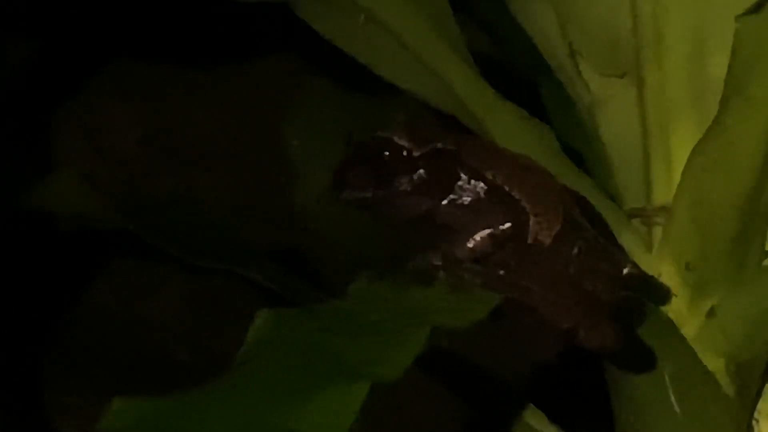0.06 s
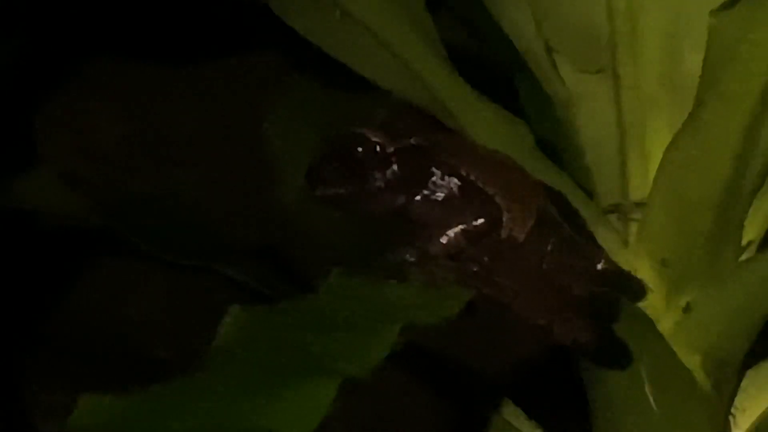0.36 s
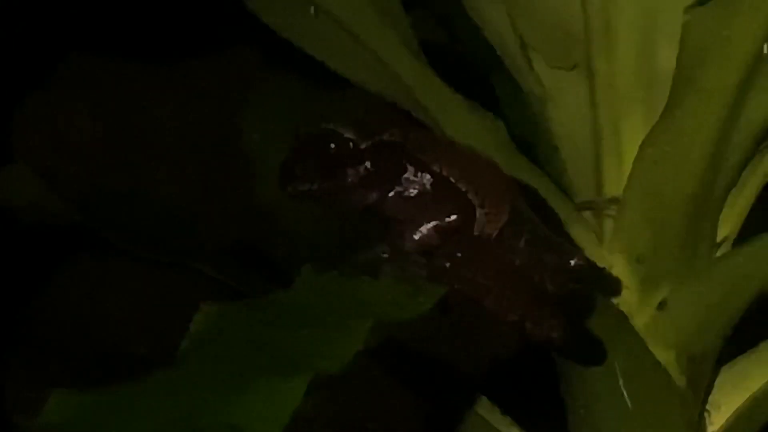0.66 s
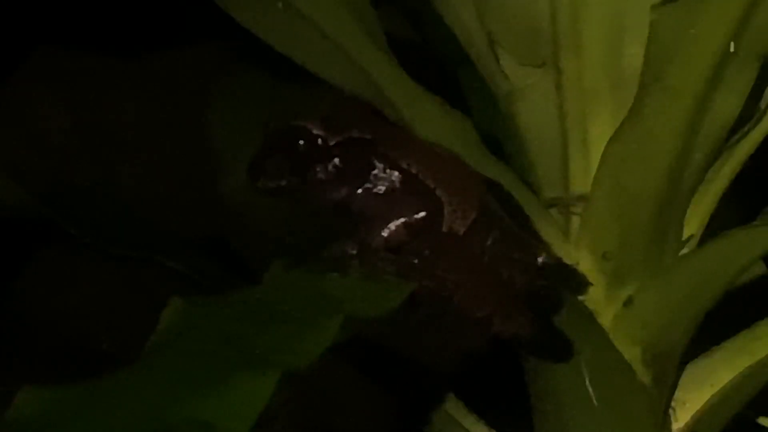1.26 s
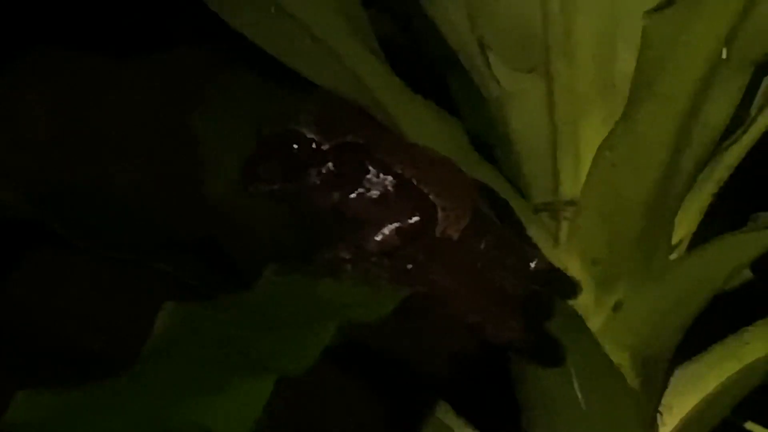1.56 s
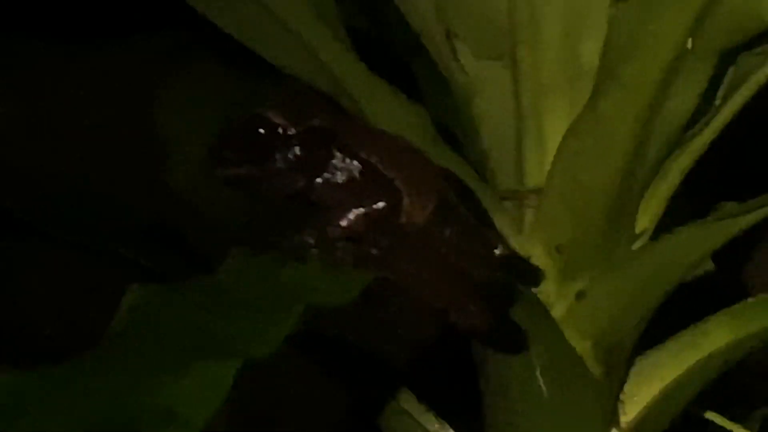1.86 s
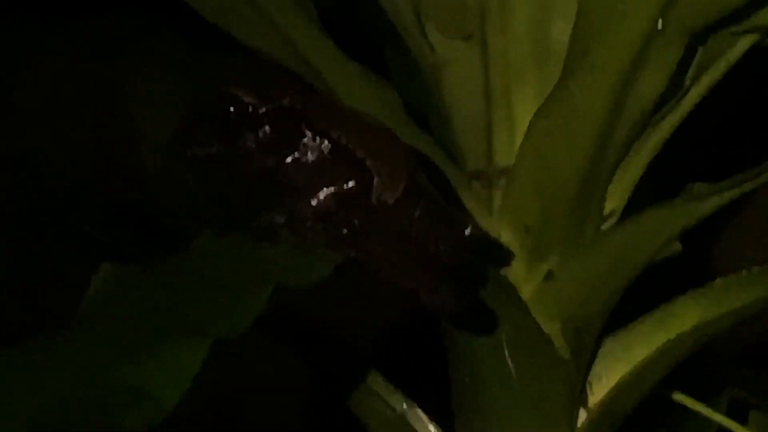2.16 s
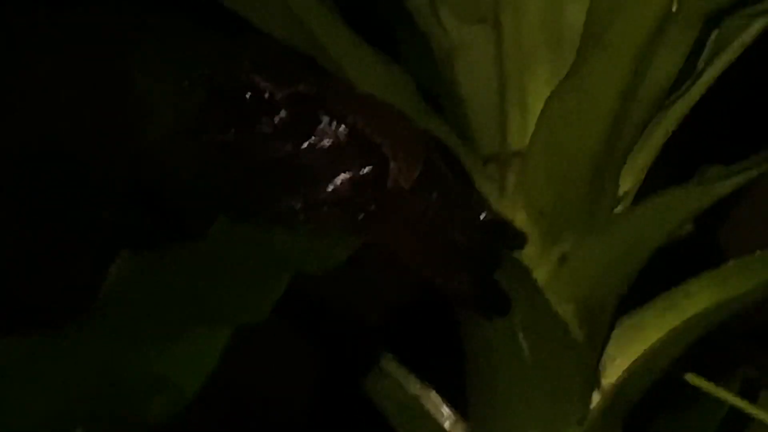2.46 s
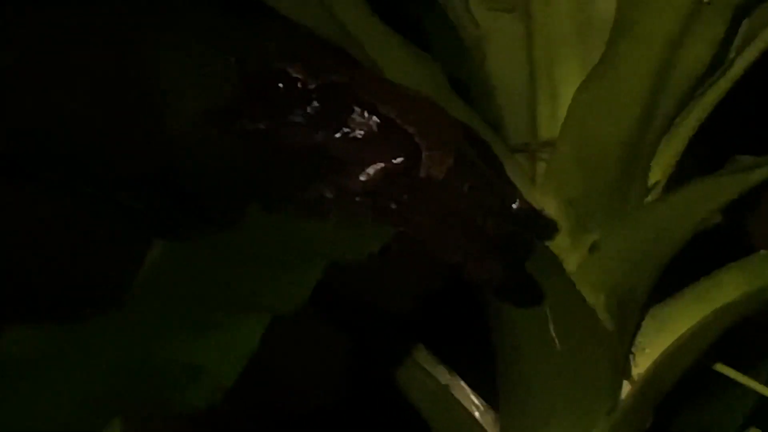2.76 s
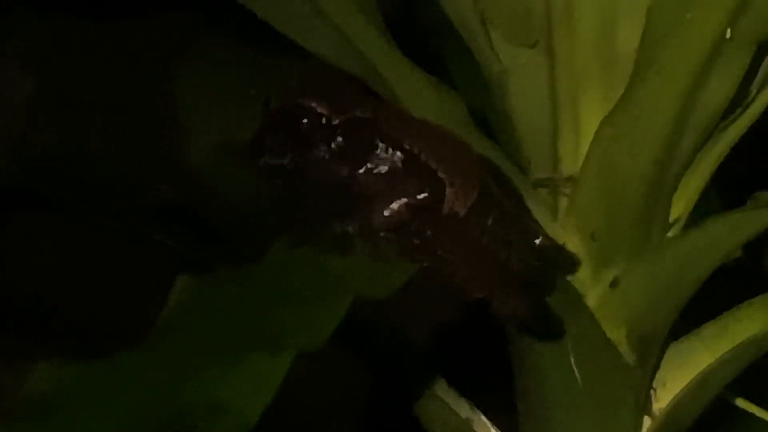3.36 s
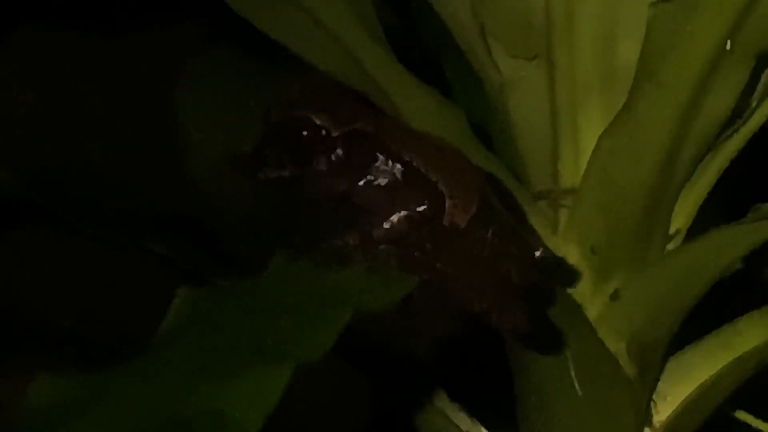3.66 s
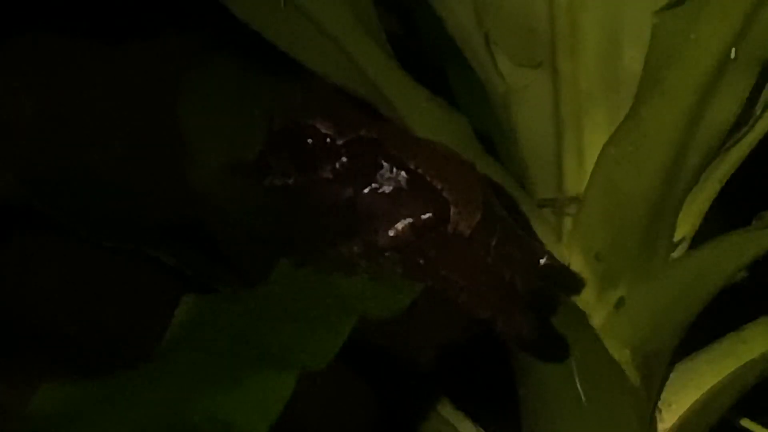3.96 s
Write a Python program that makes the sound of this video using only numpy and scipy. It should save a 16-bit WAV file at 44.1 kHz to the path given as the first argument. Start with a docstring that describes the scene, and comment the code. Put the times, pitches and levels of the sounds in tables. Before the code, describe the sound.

Crickets trill high and steady in a night forest, with small frogs peeping.

```python
"""A forest at night. One near cricket trills on a pure high note, one pulse for each wing stroke,
while groups of its neighbours, a little lower and higher, swell and fade. A lower chorus pulses
without pause, two small callers (probably frogs) peep, and one animal gives a brief rasp.
Leaves and trunks scatter the trills and peeps. Behind them are thin far trills, a haze of
distant insects, one dull knock and a faint rumble."""
import sys
import numpy as np
from scipy import signal
from scipy.fft import rfft, irfft, next_fast_len
from scipy.io import wavfile
from scipy.ndimage import map_coordinates

SR = 44100
rng = np.random.default_rng(int(sys.argv[2]) if len(sys.argv) > 2 else 0)


def store_pcm(level_fs):
    """Save levels as 16-bit WAV."""
    pcm = np.round(np.clip(level_fs, -1, 1) * 32767).astype(np.int16)
    wavfile.write(sys.argv[1], SR, np.atleast_2d(pcm).T)


N = 176400  # 4 seconds


def amp(db):
    """Turn decibels into a number to multiply by."""
    return 10 ** (np.asarray(db) / 20)


def unit(x):
    """Scale a sound to an average power of 1."""
    return x / np.sqrt(np.mean(x ** 2) + 1e-20)


def curves(rows):
    """Join timed rows with straight lines: one curve for each column after the time."""
    times, *columns = np.transpose(rows)
    return [np.interp(np.arange(N) / SR, times, column) for column in columns]


def wobble(rate):
    """A smooth curve through `rate` random values a second."""
    return map_coordinates(rng.standard_normal(1024), [np.arange(N) * rate / SR], mode="wrap")


def noise(colour):
    """Noise of power 1, shaped by rows of frequency in Hz and relative level in dB."""
    hz, db = np.transpose(colour)
    size = next_fast_len(N + SR // 2)
    bin_hz = np.fft.rfftfreq(size, 1 / SR)
    gain = amp(np.interp(np.log(bin_hz + 1), np.log(hz), db))
    spectrum = rfft(rng.standard_normal(N), size)
    return unit(irfft(spectrum * gain, size)[:N])


def add(out, x, start_s):
    """Mix x into out at the given time."""
    i = max(round(start_s * SR), 0)
    out[i:i + len(x)] += x[:max(N - i, 0)]


def forest(x, echo_db):
    """Leaves and trunks scatter a sound into a short echo; the power stays about the same."""
    fade_s = 0.26  # time to fall by 60 dB
    t = np.arange(SR // 2) / SR
    tail = rng.standard_normal(len(t)) * amp(-60 * t / fade_s)
    echo = unit(signal.fftconvolve(x, tail)[:N]) * x.std()
    return (x + amp(echo_db) * echo) / np.hypot(1, amp(echo_db))


def note(hz, length_s, sag_hz):
    """A tone that swells and fades while its pitch falls by sag_hz (or rises, if that is negative)."""
    progress = np.arange(0, 1, 1 / (length_s * SR))
    pitch_hz = hz - sag_hz * (progress - .5)
    cycles = np.cumsum(pitch_hz) / SR + rng.random()
    return np.sin(np.pi * progress) ** 2 * np.sin(2 * np.pi * cycles)


def insects(group, duty, sag_hz, scatter_hz, uneven, scatter_db, echo_db, starts=()):
    """Insects stroke their wings: each stroke is a falling note filling the share `duty` of a beat."""
    glide_s = 0.028  # after each of `starts`, the pitch slides up from below
    total = np.zeros(N)
    for hz, rate, db in group:
        voice = np.zeros(N)
        now = rng.random() / rate
        for gap_luck, pitch_luck, level_luck in rng.standard_normal((256, 3)):
            flat_hz = sum(drop * np.exp((start - now) / glide_s) for start, drop in starts if now > start)
            stroke = note(hz - flat_hz + scatter_hz * pitch_luck, duty / rate, sag_hz)
            add(voice, amp(scatter_db * level_luck) * stroke, now)
            now += np.exp(uneven * gap_luck) / rate
        total += amp(db) * unit(forest(voice, echo_db))
    return total


# The near cricket's trills. Each row: start in seconds, length in seconds, level in dB, pulses a second.
NEAR_TRILLS = [(0.124, .18, -18.5, 51.2), (.333, .26, -20, 51.2), (.936, .32, -19, 52.7),
               (1.468, .35, -23.5, 54), (1.935, .16, -20.5, 53), (2.172, .18, -22, 51.2),
               (2.387, .25, -20.5, 53.2), (2.767, .19, -22, 50.8), (3.038, .18, -21, 52),
               (3.339, .28, -20, 51.4), (3.645, .35, -24.5, 47)]


def near_cricket():
    """Evenly spaced wing strokes make trills of pure pulses; each trill starts softly."""
    pitch_hz, pulse_s = 4837, .018
    rise_db, rise_s = 5, 0.025
    out = np.zeros(N)
    for start, length, db, rate in NEAR_TRILLS:
        for age in np.arange(0, length, 1 / rate):
            level_db = db - rise_db * np.exp(-age / rise_s) + rng.normal(0, 1)
            pulse = note(pitch_hz + rng.normal(0, 11), pulse_s, sag_hz=25)
            add(out, amp(level_db) * pulse, start + age - pulse_s / 2)
    return forest(out, echo_db=-8.5)


# The crickets in each group. Each row: pitch in Hz, pulses a second, level within the group in dB.
LOWER_CRICKETS = [(4711, 50.5, -1.5), (4658, 43, -7.5), (4805, 48, -7), (4526, 65, -16)]
HIGHER_CRICKETS = [(4964, 51, -3.5), (4882, 48, -2), (5022, 48, -6)]
# How each group swells and fades. Each row: time in seconds, relative level in dB.
LOWER_SWELL = [(0.0, -27), (0.03, -29), (0.07, -38.5), (0.13, -34.5), (0.3, -30.5), (0.7, -30.5),
               (0.82, -44.5), (0.95, -29), (1.09, -26.5), (1.14, -41), (1.22, -35), (1.31, -41),
               (1.56, -26), (1.83, -36), (1.84, -39.5), (2.06, -41), (2.13, -49), (2.16, -35.5),
               (2.46, -25), (2.64, -45), (2.67, -43), (2.94, -39), (2.99, -34), (3.05, -27.5), (3.2, -34),
               (3.27, -47), (3.35, -30.5), (3.51, -31), (3.83, -44), (4.0, -26.5)]
HIGHER_SWELL = [(0.0, -41), (0.07, -42), (0.15, -36), (0.67, -27), (0.7, -34), (0.81, -44), (0.95, -29.5),
                (1.08, -26.5), (1.14, -39.5), (1.2, -34), (1.32, -41), (1.56, -27.5), (1.73, -27.5),
                (1.87, -43.5), (2.06, -32), (2.14, -46), (2.21, -37.5), (2.55, -27), (2.67, -40.5),
                (2.94, -30), (2.97, -36), (3.06, -31), (3.2, -29.5), (3.32, -37), (3.35, -37.5), (3.5, -29),
                (3.55, -30.5), (4.0, -30)]
# The lower group strikes up below its pitch. Each row: start in seconds, how far below in Hz.
LOWER_STARTS = [(.865, 120), (2.135, 60), (3.305, 260)]


def neighbour_crickets():
    """Two groups swell almost together; their pitches are so close to the near one that they beat."""
    lower_db, = curves(LOWER_SWELL)
    higher_db, = curves(HIGHER_SWELL)
    lower = insects(LOWER_CRICKETS, duty=0.86, sag_hz=70, scatter_hz=11, uneven=.03,
                    scatter_db=2.4, echo_db=-3.5, starts=LOWER_STARTS)
    higher = insects(HIGHER_CRICKETS, duty=0.99, sag_hz=70.5, scatter_hz=7.9, uneven=.03,
                     scatter_db=1.0, echo_db=-2)
    return amp(-1.35) * (amp(lower_db) * lower + amp(higher_db) * higher)


# The low chorus. Each row: pitch in Hz, pulses a second, level within the group in dB.
CHORUS_INSECTS = [(3061, 21, -5), (3145, 13, -6), (3090, 34, -6.5), (2998, 37, -9.5)]
# How the chorus swells. Each row: time in seconds, relative levels in dB of its high and low parts.
CHORUS_SWELL = [(0, -45.5, -34.5), (.6, -49, -38), (.8, -50.5, -37), (1.3, -51.5, -35.5), (1.55, -50, -40),
                (2.0, -48, -37.5), (2.45, -47, -39), (2.7, -50.5, -40), (3.1, -49, -39.5),
                (3.33, -55, -37.5), (3.5, -48.5, -38), (4, -48.5, -38)]
# The tone of countless distant insects. Each row: frequency in Hz, relative level in dB.
LOW_HAZE_COLOUR = [(1500, -43), (1950, -20.5), (2350, -12.5), (2640, -5.5), (2830, -3), (3080, 5),
                   (3300, -10.5), (3600, -18), (4000, -17.5), (4500, -42.5), (9000, -120)]
HIGH_HAZE_COLOUR = [(3800, -37.5), (4300, -3), (4600, 0.5), (4900, 8), (5200, 6.5), (5400, -3),
                    (5650, -6.5), (6100, -12), (6500, -35.5), (7100, -19), (8500, -47.5), (12000, -120)]


def insect_chorus():
    """A low chorus pulses, and insects too far off to tell apart blur into a low and a high haze."""
    high_db, low_db = curves(CHORUS_SWELL)
    pulses = insects(CHORUS_INSECTS, duty=0.59, sag_hz=70.5, scatter_hz=22, uneven=.22,
                     scatter_db=2, echo_db=-2)
    low_haze = amp(-2.5 + 1.2 * wobble(7)) * noise(LOW_HAZE_COLOUR)
    high_haze = amp(5.5) * noise(HIGH_HAZE_COLOUR)
    return amp(low_db) * (pulses + low_haze) + amp(high_db) * high_haze


# The peeps of the two small callers. Each row: middle of the peep in seconds, level in dB.
LOW_PEEPS = [(.088, -35), (.203, -33.5), (.298, -32), (.41, -34.5), (.533, -32.5), (.654, -32.5),
             (.748, -32), (.934, -37.5), (1.025, -34), (1.14, -35), (1.235, -32.5), (1.352, -33),
             (1.508, -35), (1.654, -35), (1.76, -35), (1.932, -32), (2.122, -36.5), (2.32, -35.5)]
HIGH_PEEPS = [(.078, -42), (.2, -46), (.33, -44), (.495, -41.5), (.63, -38.5), (.785, -42.5), (.93, -41.5),
              (1.1, -39), (1.24, -41.5), (1.505, -45), (1.76, -46), (1.97, -47), (3.42, -53), (3.505, -39),
              (3.59, -41), (3.68, -38.5), (3.77, -41), (3.86, -37), (3.945, -35.5)]


def peeper(peeps, hz, length_s, sag_hz, scatter_hz, echo_db):
    """One small animal, probably a frog, repeats a short whistled note."""
    out = np.zeros(N)
    for middle_s, db in peeps:
        peep = note(hz + rng.normal(0, scatter_hz), length_s, sag_hz)
        add(out, amp(db) * peep, middle_s - length_s / 2)
    return forest(out, echo_db)


# The strokes of the rasp. Each row: start in seconds, level in dB.
RASP_STROKES = [(3.627, -34), (3.646, -33.5), (3.687, -45)]
# The tone of the rasp. Each row: frequency in Hz, relative level in dB.
RASP_COLOUR = [(500, -61), (1200, -17.5), (1600, -29), (2050, -11), (2340, 4.5), (2600, -7.5), (3200, -21),
               (4500, -62), (9000, -120)]


def rasp():
    """An animal's brief hoarse call: three quick strokes of noise."""
    rise_s, fade_s = 0.0021, 0.14  # a stroke falls by 60 dB in fade_s
    loudness = np.zeros(N)
    for start, db in RASP_STROKES:
        age = np.maximum(np.arange(N) / SR - start, 0)
        rise = 1 - np.exp(-age / rise_s)
        loudness += rise * amp(db - 60 * age / fade_s)
    return loudness * noise(RASP_COLOUR)


# The far crickets' trills. Each row: start in seconds, length in seconds, pitch in Hz,
# pitch scatter in Hz, each cricket's level at its loudest in dB.
FAR_TRILLS = [(-.08, 0.24, 5770, 25, -52.5), (1.95, 1.32, 5376, 85, -51)]
# The far crickets' wing speeds. Each number: pulses a second for one cricket.
FAR_PULSE_RATES = [52, 47, 54]


def far_crickets():
    """Three distant crickets sing thin, high trills together, swelling and fading."""
    out = np.zeros(N)
    for start, length, hz, scatter_hz, db in FAR_TRILLS:
        progress = np.clip((np.arange(N) / SR - start) / length, 0, 1)
        trio = [(hz, rate, 0) for rate in FAR_PULSE_RATES]
        trill = insects(trio, duty=.7, sag_hz=250, scatter_hz=scatter_hz, uneven=0.091,
                        scatter_db=3.0, echo_db=2.5)
        out += amp(db) * np.sin(np.pi * progress) * trill
    return out


# The tone of the knock. Each row: frequency in Hz, relative level in dB.
KNOCK_COLOUR = [(120, -34), (200, -2.5), (280, 2), (420, -22), (2000, -120)]


def knock():
    """A faint dull knock close by: low noise that jumps up and dies away."""
    start_s, rise_s, peak_db = 2.04, .007, -55.5
    rise_times = np.maximum(np.arange(N) / SR - start_s, 0) / rise_s
    return amp(peak_db) * rise_times * np.exp(1 - rise_times) * noise(KNOCK_COLOUR)


# The tones of the air and of a far low drone. Each row: frequency in Hz, relative level in dB.
AIR_COLOUR = [(20, -29.5), (30, -18), (45, -2), (90, 1), (160, -4), (230, -4), (400, -8.5), (490, -4.5),
              (565, 2.5), (620, -2), (760, -5), (895, 0.5), (1020, -1), (1180, -6.5), (1350, -1.5),
              (1600, -9), (2200, -4), (4000, -17), (7200, -17), (8600, -26), (10600, -33), (13500, -28.5),
              (15600, -29.5)]
DRONE_COLOUR = [(20, -68.5), (180, -33), (255, -7.5), (285, -1.5), (310, -9.5), (400, -45), (2000, -120)]
# How the drone swells. Each row: time in seconds, relative level in dB.
DRONE_SWELL = [(0, -72), (.8, -64.5), (1.05, -55.5), (1.5, -63.5), (1.8, -75.5), (2.3, -75), (2.75, -63),
               (3.5, -65), (4, -70)]


def night_air():
    """The soft rush of night air, with a faint wavering drone far away."""
    drone_db, = curves(DRONE_SWELL)
    air = amp(-53.5 + 0.25 * wobble(6)) * noise(AIR_COLOUR)
    drone = amp(drone_db - 1.0) * noise(DRONE_COLOUR)
    return air + drone


def scene():
    """All the callers over the background, in one channel."""
    low_peeps = peeper(LOW_PEEPS, hz=2697, length_s=.052, sag_hz=239, scatter_hz=18, echo_db=-1.0)
    high_peeps = peeper(HIGH_PEEPS, hz=3388, length_s=.036, sag_hz=-280, scatter_hz=25, echo_db=-1.5)
    insect_song = near_cricket() + neighbour_crickets() + far_crickets() + insect_chorus()
    return (insect_song + low_peeps + high_peeps + rasp() + knock() + night_air())[None]


def record(dry):
    """Fade both ends so they do not click, and cut away the very highest treble."""
    fade_s, top_hz = .004, 15650
    fade = np.minimum(np.arange(N) / (fade_s * SR), 1)
    treble_cut = signal.ellip(12, .1, 90, top_hz, fs=SR, output="sos")
    return signal.sosfilt(treble_cut, dry * fade * fade[::-1])


dry = scene()
out = record(dry)
store_pcm(out)
```